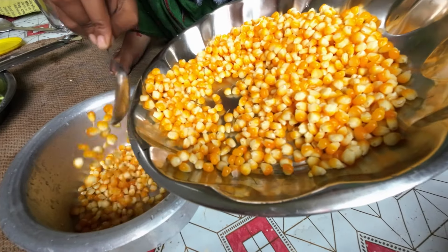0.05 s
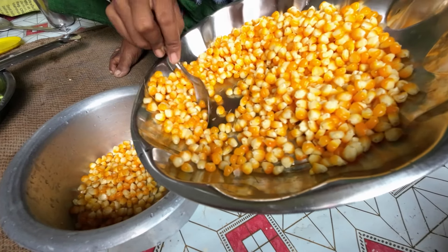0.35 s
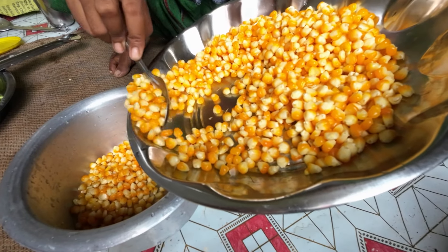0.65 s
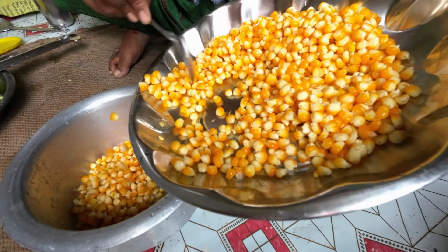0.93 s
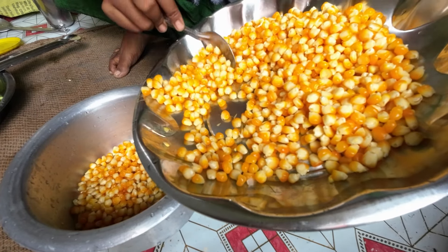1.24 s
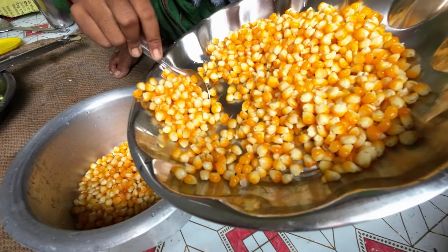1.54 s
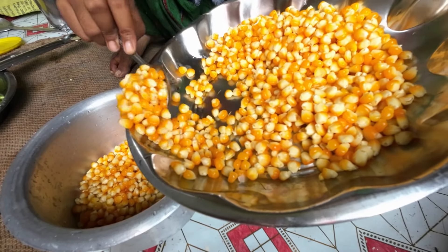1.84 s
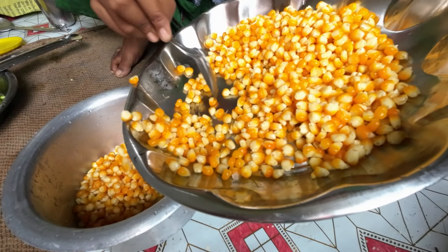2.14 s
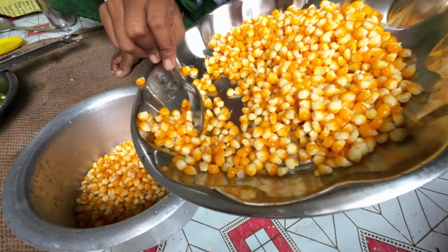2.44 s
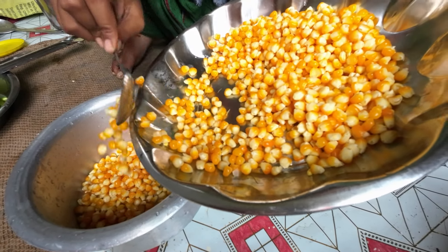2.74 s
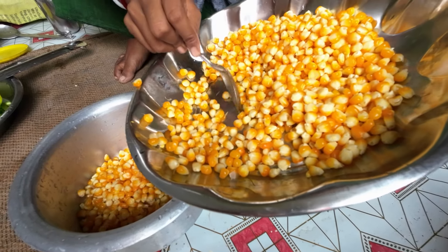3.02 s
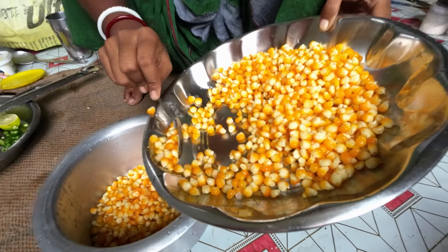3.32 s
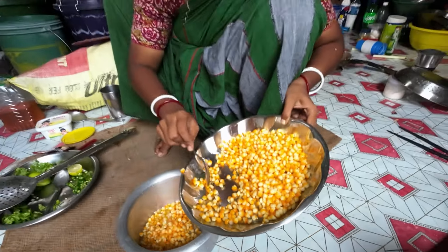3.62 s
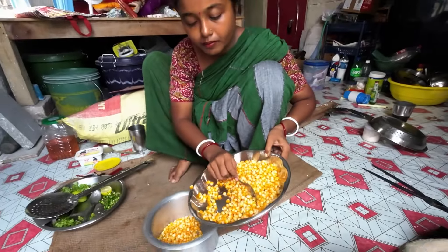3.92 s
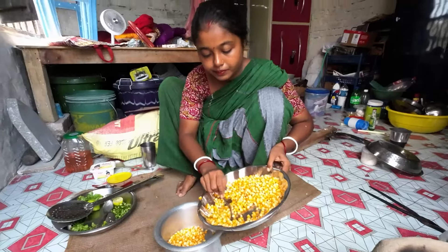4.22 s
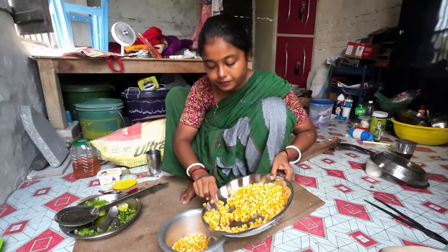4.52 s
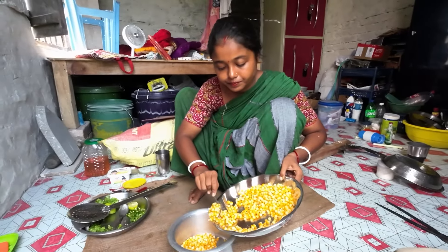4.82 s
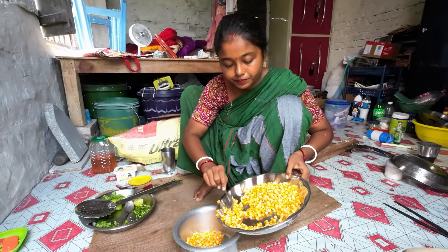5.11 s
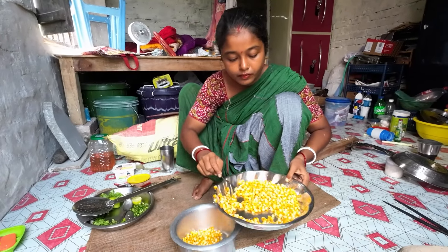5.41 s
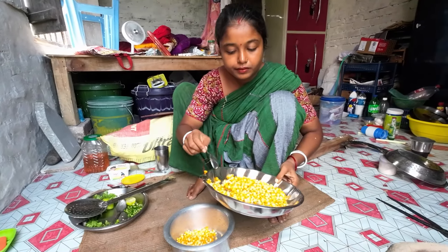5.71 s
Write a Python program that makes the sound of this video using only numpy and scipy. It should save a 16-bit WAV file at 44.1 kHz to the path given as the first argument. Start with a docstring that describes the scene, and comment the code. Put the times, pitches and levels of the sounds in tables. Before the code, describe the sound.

A steel spoon scrapes and knocks on a corn-laden steel plate, close to the microphone. It opens with a hard knock, a ringing clink and boiled kernels pattering into a metal bowl with soft, hollow plops. More spoonfuls fall around 1 and 2 seconds, with a smaller one near 3. Between pours, the corn crackles wetly as the spoon pushes through. Most knocks are short and damped; the hardest, around 1.4 seconds, overload the microphone. The steel rings freely just after 2 seconds, and the spoon squeaks briefly near 2.7. A last cluster of hard knocks and bright scrapes comes around 3.3 seconds, followed by dull handling bumps near 3.8. Softer scrapes continue from 4 seconds, then a small pour and a final clink at about 5.2 die away into the faint, steady low rumble of the house.

```python
"""A steel spoon pushes boiled corn off a hand-held steel plate into a metal bowl, close to the microphone.
From the start it scrapes and knocks on the plate, which its load damps; the hardest knocks overload
the microphone. Spoonfuls patter into the bowl, and the steel rings freely when the spoon glances off.
Midway the spoon's back squeaks; then come a last cluster of hard knocks and dull handling bumps.
Softer scrapes, a small pour and a final clink die away into the low rumble of the house."""
import sys
import numpy as np
from scipy import signal
from scipy.fft import rfft, irfft
from scipy.io import wavfile
from scipy.ndimage import uniform_filter1d

SR = 44100
rng = np.random.default_rng(int(sys.argv[2]) if len(sys.argv) > 2 else 0)


def unload_wav(signal):
    """Save mono or channel-first audio to the path in sys.argv[1] as 16-bit WAV at rate SR, clipped to [-1, 1]."""
    wavfile.write(
        sys.argv[1],
        SR,
        np.round(np.clip(np.atleast_2d(signal).T, -1, 1) * 32767).astype(np.int16),
    )


N = 254016
T = np.arange(N) / SR
HIT_T = np.arange(SR // 8) / SR  # time axis of one impact [s]

# hollow tone of the bowl under landing corn: (frequency [Hz], level [dB])
BOWL_SPECTRUM = [(100, -23), (350, -9), (560, 0), (700, 7), (900, -1.5), (1200, -2.5), (1430, 0),
                 (1750, -10.5), (2600, -23.5), (5000, -44)]
# wet crackle of kernels: (frequency [Hz], level [dB])
CRACKLE_SPECTRUM = [(900, -19.5), (1800, 15.5), (4000, 14), (6000, 6.5), (8100, 8), (8800, -1.5),
                    (10500, 2), (12500, -45), (15700, -36)]
# the spoon ploughs through the heap: (start [s], end [s], level [dB])
PUSH_MOVES = [(.39, .52, -39.5), (.6, .87, -37.5), (1.28, 1.63, -31.5), (1.66, 1.95, -32.5),
              (2.47, 2.73, -32.5), (3.125, 3.42, -34.5), (3.45, 3.76, -39.5), (4.06, 4.53, -33.5),
              (4.57, 4.72, -38.5), (4.92, 4.99, -38.5), (5.68, 5.76, -47)]
PUSH_RISE_S, PUSH_SETTLE_S = 0.013, 0.042


def amp(db):
    """Decibels to linear gain."""
    return 10 ** (np.asarray(db) / 20)


def unit_rms(x):
    """Scales to an rms of one."""
    return x / np.sqrt(np.mean(x ** 2) + 1e-20)


def unit_energy(x):
    """Scales to an energy of one."""
    return x / np.linalg.norm(x)


def unit_peak(x):
    """Scales to a peak of one."""
    return x / abs(x).max()


def decay(t, t60):
    """Envelope that falls by 60 dB in t60 seconds."""
    return np.exp(-np.log(1000) * t / t60)


def curve_at(points, hz):
    """Joins points by straight lines over log frequency."""
    f, value = np.transpose(points)
    return np.interp(np.log(hz + 1), np.log(f + 1), value)


def add(mix, at_s, sound):
    """Lays a sound into the mix."""
    part = mix[max(round(at_s * SR), 0):][:len(sound)]
    part += sound[:len(part)]


def through(x, response):
    """Passes x through an impulse response."""
    return signal.fftconvolve(x, response)[:len(x)]


def colour(points, size=4096):
    """Minimum-phase impulse response shaped by (frequency [Hz], level [dB]) points."""
    log_gain = np.log(amp(curve_at(points, abs(np.fft.fftfreq(size, 1 / SR)))))
    spectrum = np.exp(np.conj(signal.hilbert(log_gain)))
    return unit_energy(np.fft.ifft(spectrum).real[:size // 2])


def resonate(x, hz, width_hz):
    """One resonance with a gain of one at its centre."""
    return signal.lfilter(*signal.iirpeak(hz, hz / width_hz, fs=SR), x)


def grains(n, per_s, spread_db):
    """Tiny impacts of random timing, size and sign."""
    size = amp(spread_db * np.minimum(rng.exponential(1, n), 3.5)) * rng.choice([-1, 1], n)
    return unit_rms(size * (rng.random(n) < per_s / SR))


def burst(t60, snap):
    """A contact: one sharp spike, then dying chatter."""
    force = rng.standard_normal(len(HIT_T)) * decay(HIT_T, t60)
    force[0] = 2 + snap
    return force


def voiced(x, hz, boost_db, width_hz, bright_db):
    """The contact point favours one band; a sharper edge lifts the top octave."""
    x = x + (amp(boost_db) - 1) * resonate(x, hz, width_hz)
    return through(x, colour([(3000, 0), (7000, 0.57 * bright_db), (12000, bright_db)], size=256))


def wander(x, depth_db):
    """Resonances swell and give way as the contact travels over the plate."""
    bands = signal.stft(x, nperseg=512, noverlap=384)[2]
    patches = uniform_filter1d(rng.standard_normal(bands.shape), size=4, axis=0)
    patches = unit_rms(uniform_filter1d(patches, size=9, axis=1))
    return signal.istft(bands * amp(depth_db * patches), nperseg=512, noverlap=384)[1][:len(x)]


def flow(moves, rise_s, settle_s):
    """Envelope of moving corn: it gets going, holds while the move lasts, then settles."""
    envelope = np.zeros(N)
    for start, end, db in moves:
        attack = np.clip((T - start) / rise_s, 0, 1)
        release = np.exp(-np.maximum(T - end, 0) / settle_s)
        envelope = np.maximum(envelope, amp(db) * attack * release)
    return envelope


def plate_response(ring_db=-5, t60=0.045):
    """Dense steel colour plus the plate's strongest modes, cut short by the corn."""
    # modes of the loaded plate: (frequency [Hz], level [dB])
    plate_modes = [(2460, -36.5), (3348, -32.5), (3521, -59), (3951, -52.5), (4258, -25.5), (4398, -41.5),
                   (4705, -62), (5055, -36), (5335, -31), (5534, -109), (5669, -27.5), (6336, -26),
                   (6503, -128), (7111, -28), (7354, -57), (7537, -32), (7677, -24.5), (8129, -23.5),
                   (9184, -51.5), (10099, -37.5)]
    # broad tone of the steel: (frequency [Hz], level [dB])
    steel_spectrum = [(150, -33.5), (600, -9.5), (1500, -8), (2300, -3), (3000, -1), (4400, 2),
                      (5600, -0.5), (8200, -5), (8800, -8), (10400, -8), (11500, -16.5), (13500, -22),
                      (15600, -20)]
    modes = sum(amp(db) * np.sin(2 * np.pi * (hz * HIT_T + rng.random())) for hz, db in plate_modes)
    response = amp(ring_db) * unit_energy(modes * decay(HIT_T, t60))
    add(response, 0, colour(steel_spectrum))
    return unit_energy(response)


def room_tone(level_db=-38):
    """A steady bed of low house rumble and faint hiss."""
    # background of the house: (frequency [Hz], level [dB])
    house_spectrum = [(15, -5.5), (45, -5), (100, -8.5), (170, -18.5), (300, -25), (700, -25.5),
                      (1500, -29.5), (2500, -41), (7900, -43.5), (9000, -53), (15500, -60.5)]
    gain = amp(curve_at(house_spectrum, np.fft.rfftfreq(N, 1 / SR)))
    return amp(level_db) * unit_rms(irfft(rfft(rng.standard_normal(N)) * gain, N))


def scrapes(plate, attack_s=0.001, release_s=0.0025, drag_db=-25.5):
    """Tiny slips of the spoon drive the plate's high modes, while the drag shakes its low ones."""
    # spoon slides on steel:
    # (start [s], end [s], mid-stroke level [dB], swell [dB], squeal [Hz], brightness [dB])
    strokes = [(0, 0.019, -7.5, -2.5, 4000, -3), (0.429, 0.483, -20.5, 13, 7200, 15),
               (0.577, 0.673, -24.5, 1, 4400, 12), (.7, .736, -13.5, 1, 4200, -2),
               (0.766, 0.78, -14.5, -8, 3760, 2), (1.417, 1.528, -30, -1, 3220, 4.5),
               (1.53, 1.624, -26.5, -8, 3630, 2), (1.673, 1.751, -22.5, -0.5, 5500, -8),
               (3.124, 3.299, -23.5, 8.5, 7200, 22), (3.321, 3.386, -17, -7, 7700, 15.5),
               (3.425, 3.459, -14.5, 6.5, 4200, 8.5), (3.499, 3.548, -14.5, -0.5, 8170, 4),
               (3.55, 3.59, -38, 21, 7850, 16), (4.08, 4.38, -37.5, -13, 4320, 15),
               (4.404, 4.43, -33.5, 1, 4200, 0), (4.456, 4.528, -41.5, -32, 5640, 8)]
    # low body of the dragged plate: (frequency [Hz], level [dB])
    drag_spectrum = [(60, -11), (200, -4.5), (400, -6.5), (680, 4.5), (1100, 3.5), (1420, -34.5),
                     (1900, -0.5), (3500, -37)]
    out, body, t = np.zeros(N), colour(drag_spectrum), np.arange(SR // 2) / SR
    for start, end, db, swell_db, squeal_hz, bright_db in strokes:
        length = max(end - start, 0.005)
        contact = np.clip(t / attack_s, 0, 1) * np.exp(-np.maximum(t - length, 0) / release_s)
        pressure_db = db + swell_db * (np.minimum(t / length, 1) - 0.5)
        slips = grains(len(t), per_s=3000, spread_db=4.5)
        rub = wander(through(slips, plate), depth_db=4)
        rub = voiced(rub, squeal_hz, boost_db=4, width_hz=700, bright_db=bright_db)
        # the low drag grows only slowly with the pressure
        drag = amp(drag_db + 0.3 * pressure_db) * unit_rms(through(slips, body))
        add(out, start, contact * (amp(pressure_db) * unit_rms(rub) + drag))
    return out


def moving_corn(tumble_db=-1, pour_crackle_db=-19.5, push_crackle_db=-11.5, tick_width_hz=1200):
    """Small kernels at many pitches: falling corn mostly plops, pushed corn crackles as it unsticks."""
    # a spoonful pours into the bowl: (start [s], end [s], level [dB])
    pours = [(0, .28, -23.5), (.88, 1.11, -25.5), (1.96, 2.28, -25), (2.86, 3.01, -35), (5.03, 5.21, -35)]
    poured = flow(pours, rise_s=0.035, settle_s=0.061)
    pushed = flow(PUSH_MOVES, PUSH_RISE_S, PUSH_SETTLE_S)
    plops, ticks = np.zeros(N), np.zeros(N)
    for hz in np.geomspace(380, 1800, 12):
        plops += resonate(grains(N, per_s=22, spread_db=-1), hz, hz / 3)
    for hz in np.linspace(1800, 11000, 24):
        snaps = grains(N, per_s=130, spread_db=8)
        ticks += resonate(resonate(snaps, hz, tick_width_hz), hz, tick_width_hz)
    tumble = unit_rms(through(plops, colour(BOWL_SPECTRUM)))
    crackle = unit_rms(through(ticks, colour(CRACKLE_SPECTRUM)))
    crackle_envelope = amp(pour_crackle_db) * poured + amp(push_crackle_db) * pushed
    return tumble * amp(tumble_db) * (poured + pushed) + crackle * crackle_envelope


def knocks(plate, thud_gain_db=7, rebound_s=0.0049):
    """Each knock is a steel click and a hollow flexing thud; a spoon that is pressed on bounces once."""
    # spoon strikes the loaded plate: (time [s], click peak [dB], relative thud level [dB],
    # thud tilt [dB/octave], favoured mode [Hz], rebound share [0-1])
    strikes = [(.0214, 6, -5.5, -0.5, 7050, 0.31), (.4184, -5, -11.5, -3.5, 4400, 0),
               (.4579, -9, -11.5, -7.5, 5640, 0), (.5616, 2, -13, -3, 3640, 1),
               (.7013, -7, -29, 5, 4350, 0.2), (.8285, 4.5, -14, 9.5, 8450, 0.03),
               (.8729, -13.5, -30, 10, 3300, 0), (1.0296, -13, -31, 4, 3300, 0),
               (1.0715, -11.5, -34, 8, 4400, 0), (1.2251, -19, -27, 14.5, 3150, 0.1),
               (1.3189, -15, -21.5, 5.5, 4320, 0.4), (1.3788, 13, -15, 8, 3430, 0),
               (1.4067, 6.5, -13.5, -2.5, 3180, 0.57), (1.5239, 5.5, -15.5, 5.5, 3520, 0.02),
               (1.7928, -20, -28.5, 2, 5710, 0.1), (1.8143, -16.5, -25.5, 5, 4750, 0),
               (1.9435, -10.5, -28, 5.5, 7500, 0.28), (1.9869, -15.5, -45, -2, 3330, 0),
               (2.044, -17.5, -27, 12, 3720, 0.3), (2.1271, -7.5, -20.5, 8, 4200, 0),
               (2.3052, -13.5, -16.5, 1, 3150, 0), (2.4604, -20.5, -25.5, -1, 4450, 0.7),
               (2.6364, -19, -33, -2, 3800, 0), (2.6983, -21, -30.5, 2.5, 2700, 0),
               (3.1323, -8.5, -19.5, -4, 7100, 0.02), (3.2735, -1.5, -7.5, -5.5, 5570, 0.67),
               (3.2904, 1.5, -3.5, 1, 5900, 0.1), (3.3104, 1, -10, 9, 3800, 0.65),
               (3.5404, -12, -43, 16, 8140, 0), (3.6446, -24, -32, 8, 3700, 0),
               (4.0801, -9.5, -21, -5, 4650, 0), (4.1138, -23, -27, -7, 8060, 0),
               (4.5979, -22, -50, 2, 4240, 0.1), (4.6875, -28, -35.5, -2, 4750, 0.5),
               (4.9322, -25.5, -45, 17.5, 5340, 0.4), (5.3547, -24.5, -48.5, 13, 3680, 0.6)]
    # the plate's low flexing modes: (frequency [Hz], width [Hz], level [dB])
    flex_modes = [(398, 650, -5), (691, 350, 2), (1370, 690, -4.5)]
    out, pivot_hz = np.zeros(N), flex_modes[1][0]
    for onset, click_db, thud_db, tilt_db, mode_hz, rebound in strikes:
        for at, share in [(onset, 1), (onset + rebound_s, rebound)]:
            click = through(burst(t60=0.023, snap=2), plate)
            click = voiced(click, mode_hz, boost_db=5, width_hz=600, bright_db=-5)
            add(out, at, share * amp(click_db) * unit_peak(click))
            force = burst(t60=0.031, snap=7.4)
            for hz, width_hz, mode_db in flex_modes:
                thud = resonate(resonate(force, hz, width_hz), hz, width_hz)
                level_db = thud_db + thud_gain_db + mode_db + tilt_db * np.log2(hz / pivot_hz)
                add(out, at, share * amp(level_db) * unit_peak(thud))
                force = -force  # neighbouring modes swing in opposite senses
    return out


def clinks(plate, ring_db=-4, shimmer_db=-9, tick_db=2, width_hz=350, bright_db=7):
    """Freed from the corn, the steel rings on: a sharp tick, then clear modes over a dense shimmer."""
    # spoon glances off: (time [s], level [dB], favoured mode [Hz], boost of that mode [dB])
    glances = [(0.026, -12, 2130, 14.5), (2.092, -12, 2800, 9), (2.1875, -11, 5000, 2.5),
               (3.796, -32.5, 2240, 10), (5.173, -34.5, 5000, 4), (5.2166, -17.5, 2900, 2)]
    # free spoon and rim modes: (frequency [Hz], level [dB], t60 [s])
    free_modes = [(1044, 2, .4), (2137, -9, .7), (2229, -6, .7), (2654, -8, .55), (2900, -4, .3),
                  (3048, -10, .4), (3144, -11, .8), (3261, -11, .4), (3779, -8, .65), (4194, -14, .6),
                  (4387, -5, .35), (4608, -7, .55), (4870, -1, .25), (4925, -5, .4), (5313, -7, .24),
                  (5615, -5, .16), (6390, -3, .34), (6982, -2, .22), (7537, -11, .28), (7881, -8, .18),
                  (8247, -13, .28), (9722, -8, .12)]
    out, t = np.zeros(N), np.arange(SR) / SR
    for at, db, centre_hz, boost_db in glances:
        ring = np.zeros(SR)
        for hz, mode_db, t60 in free_modes:
            contact_db = boost_db * np.exp(-((hz - centre_hz) / width_hz) ** 2)
            partial = np.sin(2 * np.pi * (hz * t + rng.random()))
            ring += amp(mode_db + contact_db) * decay(t, t60) * partial
        add(out, at, amp(db + ring_db) * unit_peak(ring))
        shimmer = rng.standard_normal(SR) * decay(t, t60=0.29)
        tick = burst(t60=0.04, snap=2)
        for force, layer_db in [(shimmer, shimmer_db), (tick, tick_db)]:
            layer = voiced(through(force, plate), centre_hz, boost_db, width_hz, bright_db)
            add(out, at, amp(db + layer_db) * unit_peak(layer))
    return out


def kernel_drops(rise_s=0.0023, t60=0.023, tick_db=-12):
    """A soft kernel lands with a short hollow plop and a wet tick in proportion."""
    # the heaviest kernels land: (time [s], plop peak [dB], pitch [Hz])
    landings = [(.069, -4.5, 730), (.091, -6.5, 624), (.114, -2.5, 1050), (0.126, -6.5, 1210),
                (.151, -6, 1416), (.156, -4, 700), (.173, -7.5, 734), (.246, -17, 620), (.259, -6, 675),
                (0.326, -15, 545), (0.79, -15, 1470), (.882, -13, 1410), (.971, -8, 654), (.99, -4.5, 955),
                (1.009, -9, 770), (1.084, -9.5, 590), (1.105, -9, 670), (1.164, -20.5, 750),
                (1.609, -12.5, 983), (1.677, -16, 780), (1.721, -13.5, 1070), (1.748, -16.5, 724),
                (1.979, -24, 690), (2.052, -11.5, 730), (2.1, -1, 745), (2.158, -11.5, 690),
                (2.213, -9.5, 1410), (2.242, -10, 767), (2.407, -17, 960), (2.518, -10.5, 993),
                (2.767, -22, 773), (2.873, -24, 630), (2.886, -15, 714), (2.945, -15, 653),
                (2.964, -11.5, 652), (4.207, -17, 1050), (4.601, -21.5, 1640), (5.051, -18.5, 730),
                (5.126, -17.5, 680), (5.139, -20, 725), (5.168, -18, 760)]
    out, bowl, wet = np.zeros(N), colour(BOWL_SPECTRUM), colour(CRACKLE_SPECTRUM)
    for at, db, hz in landings:
        tone = np.sin(2 * np.pi * hz * HIT_T) * decay(HIT_T, t60) * (1 - np.exp(-HIT_T / rise_s))
        hollow = through(burst(t60=0.038, snap=0.96), bowl)
        plop = unit_peak(tone) + unit_peak(hollow)
        tick = through(burst(t60=0.044, snap=5.7), wet)
        add(out, at, amp(db) * unit_peak(plop))
        add(out, at, amp(db + tick_db) * unit_peak(tick))
    return out


def taps(plate, gain_db=-13):
    """While it ploughs, the spoon keeps touching the plate lightly."""
    touches = through(grains(N, per_s=35, spread_db=4), burst(t60=0.018, snap=1.7))
    pushed = flow(PUSH_MOVES, PUSH_RISE_S, PUSH_SETTLE_S)
    return amp(gain_db) * pushed * unit_rms(through(touches, plate))


def squeak(tilt_db_per_octave=-7):
    """Regular stick and slip that quickens as the spoon speeds up."""
    # the spoon's back rubs: (time [s], pitch [Hz], level [dB])
    glide = [(2.645, 350, -54), (2.661, 304.5, -39), (2.689, 392, -34), (2.717, 495, -28.5),
             (2.745, 594, -62)]
    times, hz, db = np.transpose(glide)
    cycles = np.cumsum(np.interp(T, times, hz)) / SR
    tone = sum(amp(tilt_db_per_octave * np.log2(k)) * np.sin(2 * np.pi * k * cycles)
               for k in range(1, 7))
    return tone * amp(np.interp(T, times, db)) * (T > times[0]) * (T < times[-1])


def handling_bumps(rise_s=0.0034, t60=0.047):
    """Soft low bumps that shake the hand-held plate a little."""
    # dull bumps of handling: (time [s], level [dB], pitch [Hz])
    bumps = [(3.795, -19.5, 102), (3.825, -24, 108), (3.884, -13.5, 102), (4.666, -28.5, 61)]
    out = np.zeros(N)
    muffled = colour([(80, 6.5), (300, 1.0), (600, -2), (1500, -32.5), (4000, -59)])
    for at, db, hz in bumps:
        thump = np.sin(2 * np.pi * hz * HIT_T) * decay(HIT_T, t60) * (1 - np.exp(-HIT_T / rise_s))
        shake = through(burst(t60=0.059, snap=2.3), muffled)
        add(out, at, amp(db) * (unit_peak(thump) + unit_peak(shake)))
    return out


def kitchen_reverb(x, predelay_s=0.0024, echoes_per_s=3000):
    """Sparse reflections, each band dying at its own speed."""
    # decay of the kitchen: (frequency [Hz], t60 [s])
    decay_times = [(150, 0.34), (700, 0.3), (3000, 0.29), (8000, 0.19), (16000, 0.12)]
    n = SR // 2
    echoes = rng.choice([-1., 1.], n) * (rng.random(n) < echoes_per_s / SR) * (T[:n] > predelay_s)
    hz, t, bands = signal.stft(echoes, SR, nperseg=256)
    bands *= decay(t, curve_at(decay_times, hz)[:, None])
    tail = signal.istft(bands, SR, nperseg=256)[1]
    return through(x, unit_energy(tail))


def scene():
    """Spoon, plate and corn up close in mono, with a little of the room."""
    plate = plate_response()
    steel = knocks(plate) + taps(plate) + scrapes(plate) + clinks(plate)
    close = steel + kernel_drops() + moving_corn() + handling_bumps() + squeak()
    return (close + amp(-15) * kitchen_reverb(close) + room_tone())[None]


def record(dry):
    """The hardest knocks clip the microphone; a steep low-pass then trims the very top."""
    lowpass = signal.firwin(511, cutoff=16200, window=("kaiser", 9), fs=SR)
    return signal.oaconvolve(np.clip(dry, -1, 1), lowpass[None], "same")


dry = scene()
out = record(dry)
unload_wav(out)
```